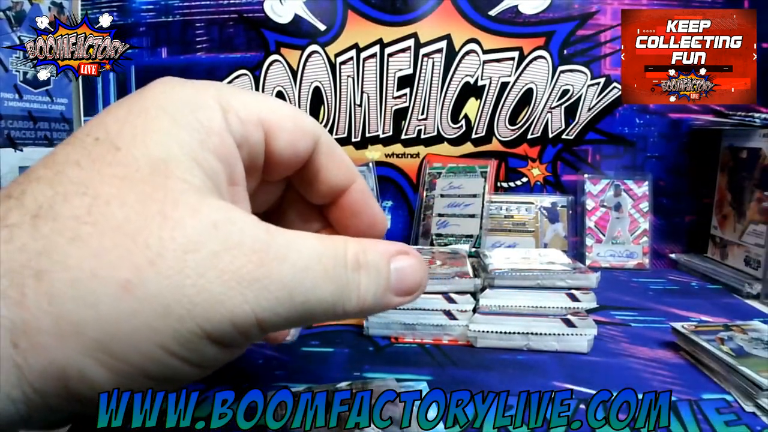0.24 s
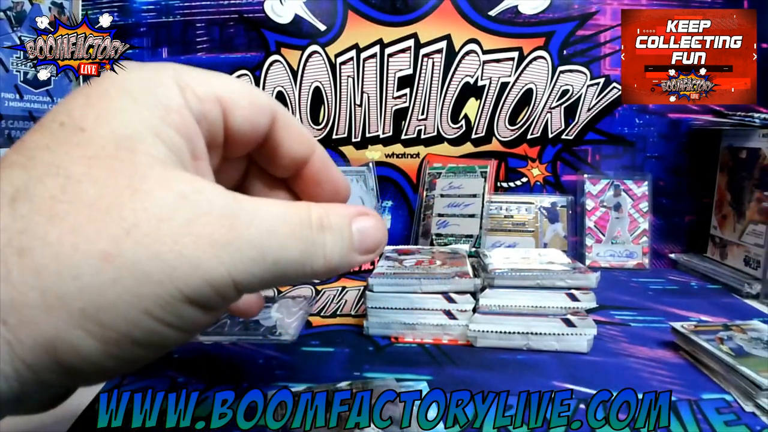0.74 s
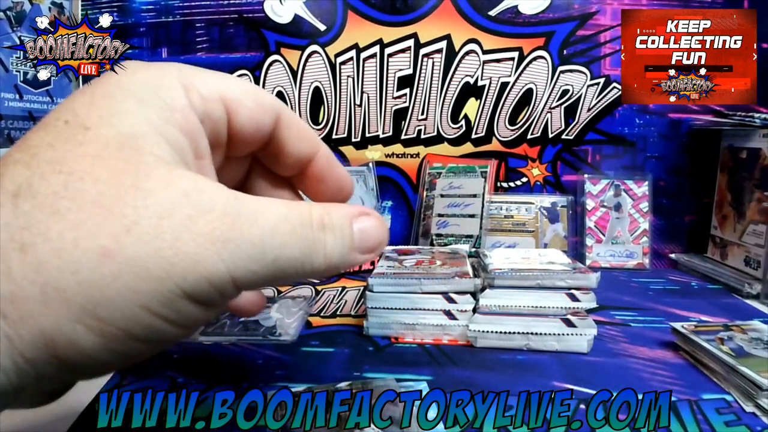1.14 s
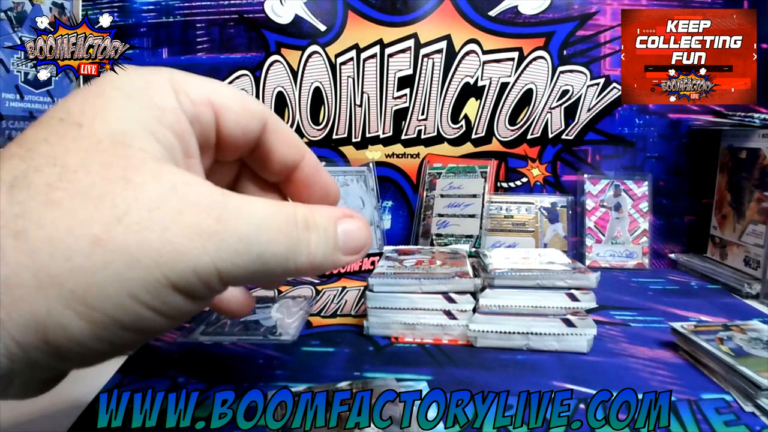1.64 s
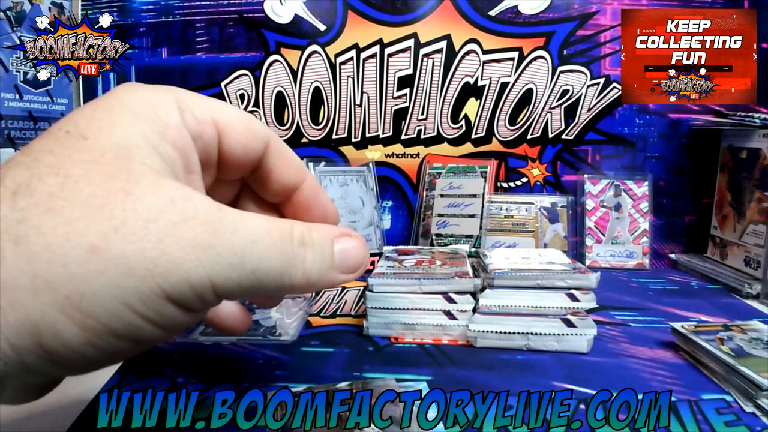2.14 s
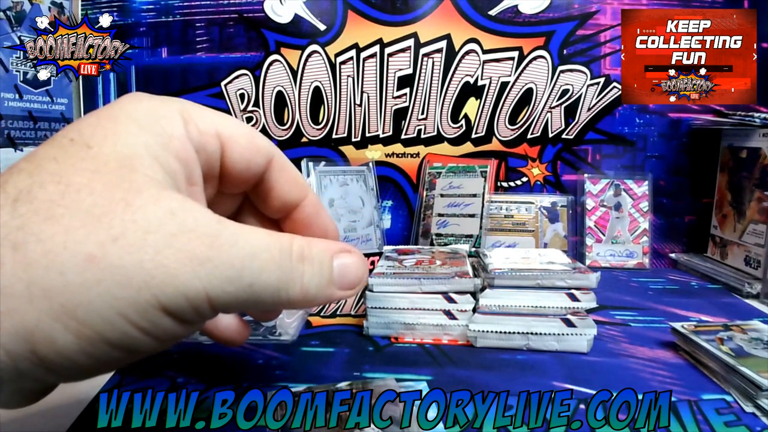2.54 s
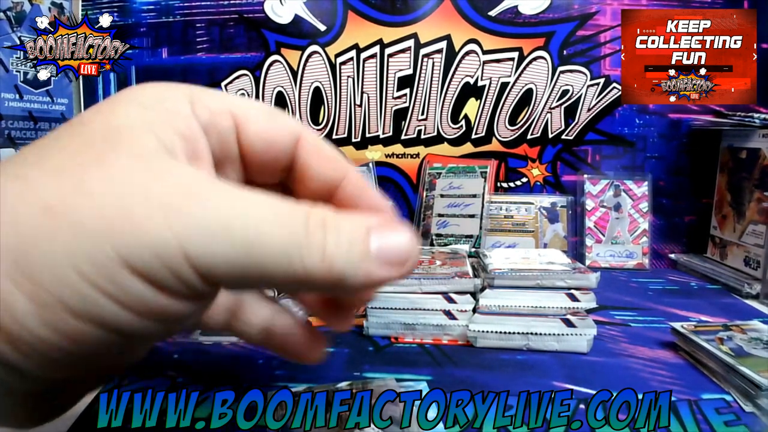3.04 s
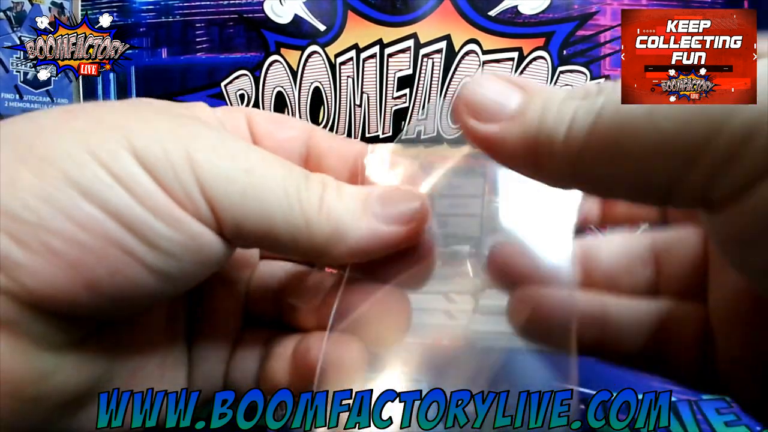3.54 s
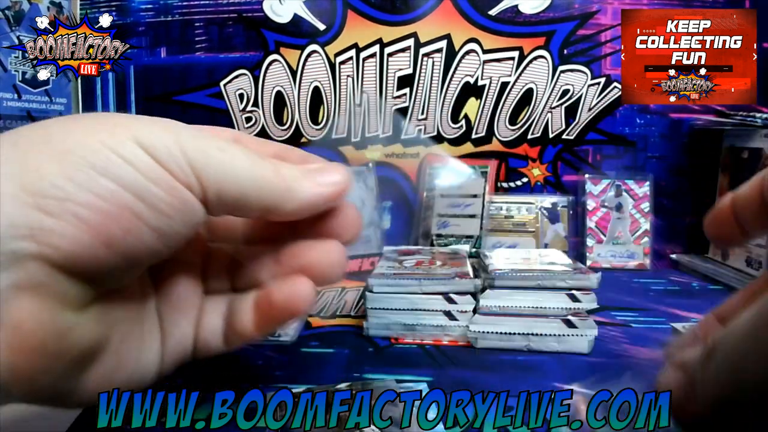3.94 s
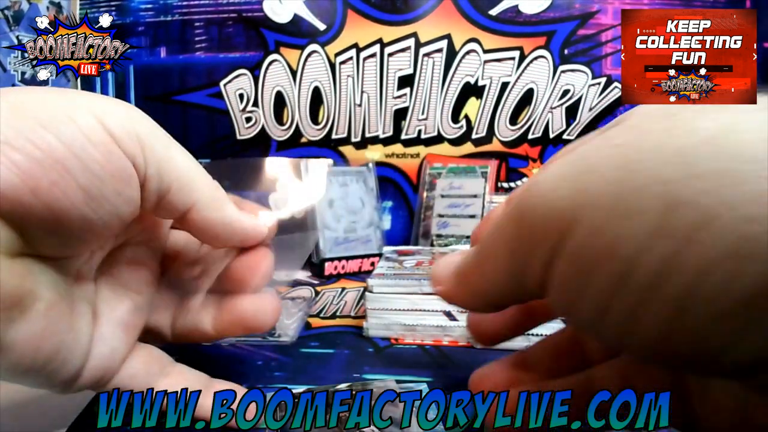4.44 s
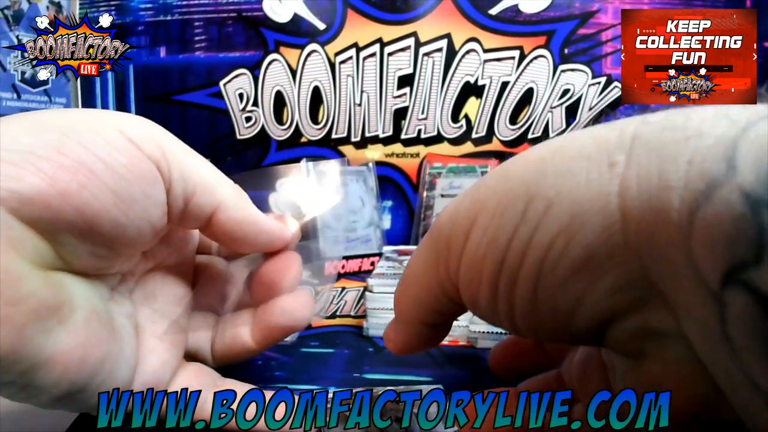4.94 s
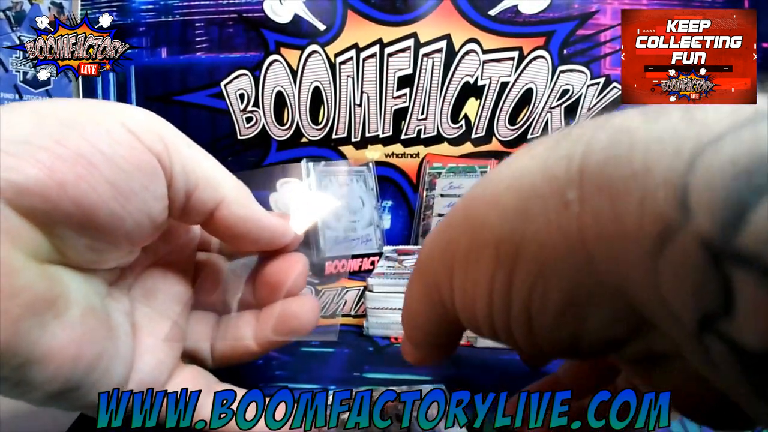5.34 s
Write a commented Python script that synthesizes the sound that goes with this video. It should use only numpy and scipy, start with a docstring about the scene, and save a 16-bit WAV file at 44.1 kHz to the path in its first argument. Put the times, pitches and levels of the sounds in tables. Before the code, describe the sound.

Thin plastic film crinkles in sharp, close snaps and crackly finger friction, then softens to faint hissy rubbing with small table bumps in a quiet room.

```python
"""At a table in a quiet room, hands pull a thin plastic card sleeve from a pack beside a two-port microphone,
then open it in front. Buckling creases make the film snap: each is a sharp step with a brief shiver and a
ringing stiff edge. Finger friction is filtered noise, part smooth hiss and part dense small crackles.
Wrists bump and drag on the table as decaying low sines and dark noise; air noise, a hum and a thin whine
fill the room."""
import sys
import numpy as np
from scipy import signal
from scipy.fft import rfft, irfft
from scipy.io import wavfile
from scipy.ndimage import uniform_filter1d, map_coordinates

SR = 44100
rng = np.random.default_rng(int(sys.argv[2]) if len(sys.argv) > 2 else 0)


def waveform_to_disk(signal):
    """Save audio, clipped to [-1, 1], as 16-bit WAV at the path in sys.argv[1]."""
    frames = np.transpose(np.atleast_2d(signal))
    scaled = np.clip(frames, -1, 1) * 32767
    samples = np.round(scaled).astype(np.int16)
    wavfile.write(sys.argv[1], SR, samples)


N = 246519


def gain_of(db):
    """Level definition: decibels to an amplitude factor."""
    return 10 ** (np.asarray(db) / 20)


def evened(x):
    """Power normalisation: scales to rms 1."""
    return x / np.sqrt(np.mean(x ** 2) + 1e-20)


def read(points, hz):
    """Logarithmic pitch scale: interpolates a spectrum table along log frequency."""
    f, value = np.transpose(points)
    return np.interp(np.log(hz + 1), np.log(f + 1), value)


def curves(rows):
    """Linear interpolation in time: each column of a timed table, sample by sample."""
    s, *columns = np.transpose(rows)
    return [np.interp(np.arange(N) / SR, s, column) for column in columns]


def colour(x, points):
    """Minimum-phase filtering: a causal response of energy 1 with the spectral shape of the table."""
    hz = abs(np.fft.fftfreq(8192, 1 / SR))
    log_gain = np.log(gain_of(read(points, hz)))
    # the Hilbert transform of the log gain gives the minimum phase
    spectrum = np.exp(np.conj(signal.hilbert(log_gain)))
    taps = np.fft.ifft(spectrum).real[:4096]
    taps /= np.linalg.norm(taps)
    return signal.oaconvolve(x, taps[None], axes=-1)[..., :N]


def add(mix, s, sound):
    """Superposition: mixes a short sound in at time s."""
    part = mix[round(s * SR):][:len(sound)]
    part += sound[:len(part)]


def wavering(hz, width_hz, db, steady):
    """Narrow-band modulation: a tone whose height and phase wander slowly about a steady part."""
    r = np.exp(-np.pi * width_hz / SR)
    noise = rng.standard_normal(N) + 1j * rng.standard_normal(N)
    drift = signal.lfilter([1], [1, -r], noise)
    carrier = np.exp(2j * np.pi * hz * np.arange(N) / SR)
    tone = (steady + drift / np.std(drift)) * carrier
    return gain_of(db) * evened(tone.real)


# spectral shape of air handling and microphone hiss: f/Hz, relative level/dB
ROOM_SPECTRUM = [(25, 6.5), (60, -45), (120, -0.5), (250, 5), (700, -4.5), (1200, -10), (3000, -10),
                 (6500, -5), (9500, -9.5), (13500, -7.5), (14800, -17)]
# left-right likeness of that noise: f/Hz, likeness [0-1]
ROOM_LIKENESS = [(130, 1), (640, 0.42), (1400, 0.023), (3000, 0.0059)]


def room(air_db=-59):
    """Diffuse-field coherence: air handling and microphone hiss, alike in the bass only, with hum and whine."""
    hz = np.fft.rfftfreq(N, 1 / SR)
    a, b = rfft(rng.standard_normal((2, N))) * gain_of(read(ROOM_SPECTRUM, hz))
    same = np.clip(read(ROOM_LIKENESS, hz), 0, 1)
    air = irfft(np.array([a, same * a + np.sqrt(1 - same ** 2) * b]), N)
    hum = wavering(hz=120, width_hz=16, db=-62.5, steady=.4)
    whine = wavering(hz=13899, width_hz=4, db=-74, steady=3)
    return gain_of(air_db) * evened(air) + hum + whine


# strokes of the fingers over the film: start t/s, hold t/s, level/dB, gain of the treble/dB
STROKES = [(0.0, 0.14, -61.5, -5), (0.613, 0.036, -42.5, -3.5), (0.658, 0.015, -36, 3.5),
           (0.813, 0.049, -57, -8), (0.987, 0.028, -31.5, 0.5), (1.087, 0.096, -37, -4.5),
           (1.201, 0.045, -40.5, -7), (1.324, 0.016, -38, -1), (1.393, 0.054, -40, 3),
           (1.496, 0.089, -42, 1), (1.716, 0.063, -35, -1), (1.832, 0.075, -38, -1),
           (1.99, 0.076, -49.5, -1), (2.128, 0.054, -41.5, -1), (2.21, 0.044, -43.5, -17),
           (2.337, 0.036, -33.5, 1), (2.441, 0.041, -38.5, -1.5), (2.607, 0.078, -47, 0.5),
           (2.707, 0.12, -41, -3), (2.81, 0.076, -53, 13), (2.981, 0.038, -51, 13.5),
           (3.187, 0.0049, -55, 19.5), (3.226, 0.029, -49.5, 8), (3.425, 0.03, -49.5, 7),
           (3.475, 0.13, -47, 9.5), (3.562, 0.13, -56, 18.5), (3.717, 0.016, -42.5, 10),
           (3.785, 0.12, -46, 11.5), (3.942, 0.23, -56, 9.5), (4.107, 0.036, -46, 9),
           (4.17, 0.063, -48.5, 7), (4.314, 0.21, -55, 5.5), (4.89, 0.042, -49, 6),
           (5.003, 0.0055, -56.5, -3), (5.17, 0.21, -52, 7), (5.47, 0.084, -60, 7)]


def strokes(grip_db_per_s=908, release_db_per_s=277, rest_db=-70):
    """Power addition of envelopes: each stroke catches fast, holds and lets go slower; also the treble gain/dB."""
    t = np.arange(N) / SR
    power = top = gain_of(2 * rest_db)
    for start, hold, db, top_db in STROKES:
        before = np.maximum(start - t, 0)
        after = np.maximum(t - start - hold, 0)
        fall = grip_db_per_s * before + release_db_per_s * after
        power = power + gain_of(2 * (db - fall))  # doubled dB: a factor on power
        top = top + gain_of(2 * (db + top_db - fall))
    return 10 * np.log10(power), 10 * np.log10(top / power)


# hands and wrists knocking the table: t/s, peak level before the port balance/dB, f/Hz
BUMPS = [(0.6, -28.5, 61), (0.616, -38, 122.7), (0.653, -41, 40.4), (1.002, -44, 45), (1.334, -37.5, 123),
         (1.444, -37, 39.46), (2.142, -37, 88), (2.161, -49, 47), (4.235, -36, 111), (4.383, -35.5, 90),
         (4.891, -34, 95.8), (5.109, -40.5, 98.6), (5.391, -36, 53.7)]
# hands resting and dragging on the table top: t/s, level while the strokes are at -50 dB/dB
DRAG = [(0, -48), (.6, -49.5), (1.1, -58), (1.75, -57), (2.15, -51.5), (2.8, -57), (3.25, -51.5),
        (3.6, -56), (4.15, -55.5), (4.35, -51), (4.55, -46), (4.7, -54.5), (5.2, -51.5), (5.4, -44),
        (5.46, -53)]
# spectral shape of the drag: f/Hz, relative level/dB
TABLE_SPECTRUM = [(20, 8.5), (60, -5), (130, -0.5), (200, -10), (276, -6.5), (370, -23.5), (490, -10),
                  (570, -20), (657, -11), (800, -20.5), (2500, -25.5)]


def table(lumps_db=2.5, follow=0.48, t60=0.057):
    """Structure-borne sound: low knocks and a lumpy drag, rising with each stroke, reach both ports by the stand."""
    knocks, t = np.zeros(N), np.arange(SR // 4) / SR
    for s, db, hz in BUMPS:
        onset = 1 - np.exp(-t / 0.0028)
        knock = gain_of(-60 * t / t60) * np.sin(2 * np.pi * hz * t) * onset
        add(knocks, s, gain_of(db) * knock / abs(knock).max())
    lumps = gain_of(lumps_db * evened(uniform_filter1d(rng.standard_normal(N), 800)))
    drag_db = curves(DRAG)[0] + follow * (strokes()[0] + 50)
    rough = evened(lumps) * rng.standard_normal((2, N))
    a, b = colour(rough, TABLE_SPECTRUM) * gain_of(drag_db)
    balance = gain_of([[-.8], [.8]])  # left, right
    return balance * (knocks + a + 0.3 * np.array([b, -b]))


def echoes(x, t60=0.033, first_ms=0.94):
    """Early reflection: table top, stacked packs and walls answer with a short tail of sparse taps."""
    t = np.arange(SR // 4) / SR
    taps = rng.choice([-1., 1.], (2, len(t))) * (rng.random((2, len(t))) < .08)
    taps *= gain_of(-60 * t / t60) * (1000 * t > first_ms)
    taps /= np.linalg.norm(taps, axis=1, keepdims=True)
    return signal.oaconvolve(x, taps, axes=1)[:, :N]


# how the film is handled: t/s, likeness of the ports below the treble [0-1], crackle share of power [0-1]
HANDS = [(2.5, 0.84, 0.56), (2.6, 0.32, 0.45), (3.18, 1, 0)]
# the sleeve moves from the right to the front: t/s, delay of the left port/ms
PLACE = [(3.1, .16), (3.18, .03)]


def ports(x, other, apart_hz=8500, apart=0.037):
    """Path difference and coherence: the left port hears late, and partly by another path, mostly in the treble."""
    delay_ms, same = curves(PLACE)[0], curves(HANDS)[0]
    heard_at = np.arange(N) - delay_ms * SR / 1000
    late = map_coordinates(x, [heard_at], order=5, mode="nearest")
    top = 1 / (1 + (apart_hz / (np.fft.rfftfreq(N, 1 / SR) + 1)) ** 6)
    left = 0
    for band, like in ((1 - top, same), (top, apart * same)):
        like = np.clip(like, 0, 1)
        blend = like * late + np.sqrt(1 - like ** 2) * other
        left = left + irfft(band * rfft(blend), N)
    return np.array([left, x])


def patchy(x, depth_db, width=4, length=20):
    """Time-frequency modulation: random patches give each crease and stroke its own colour."""
    hz, t, z = signal.stft(x, nperseg=256, noverlap=192)
    field = rng.standard_normal((len(hz), len(t)))
    field = uniform_filter1d(field, width, 0)  # across frequency
    field = evened(uniform_filter1d(field, length, 1))  # along time
    shaped = z * evened(gain_of(depth_db * field))
    return signal.istft(shaped, nperseg=256, noverlap=192)[1][..., :N]


# spectral shape of the film's crackles and snaps: f/Hz, relative level/dB
FILM_SPECTRUM = [(500, -47.5), (1500, -11), (2700, -8.5), (3350, 1), (4100, -7.5), (4900, 2), (5500, 0.5),
                 (6750, 7), (7600, 0.5), (9000, -8), (11500, -4.5), (12700, -9), (13600, 0), (14800, -56)]
# spectral shape of the smooth friction: f/Hz, relative level/dB
HISS_SPECTRUM = [(700, -21), (2500, -7.5), (4300, -6), (6500, 7.5), (8000, -0.5), (10300, -11), (12700, -6),
                 (14500, -20)]


def rub(per_s=330, spread_db=6.5, flutter_db=2, grain_ms=1.0, sheen_hz=9500, patch_db=3.0):
    """Stick-slip friction: smooth hiss plus many small random creases, both following the strokes."""
    crackle = np.clip(curves(HANDS)[1], 0, 1)
    sizes = gain_of(spread_db * np.minimum(rng.exponential(1, N), 2.6))
    sizes *= rng.random(N) < per_s / SR  # creases fall at random times
    creases = evened(signal.lfilter([1], [1, -np.exp(-1000 / grain_ms / SR)], sizes))
    slips = evened(uniform_filter1d(rng.standard_normal(N), 400))  # the grip slips
    flutter = evened(gain_of(flutter_db * slips))
    film = colour(np.sqrt(crackle) * creases * rng.standard_normal((2, N)), FILM_SPECTRUM)
    film += colour(np.sqrt(1 - crackle) * flutter * rng.standard_normal((2, N)), HISS_SPECTRUM)
    film = patchy(film, patch_db)
    high_pass = signal.butter(4, sheen_hz, "high", fs=SR, output="sos")
    top = signal.sosfiltfilt(high_pass, film)
    level_db, sheen_db = strokes()
    stroked = gain_of(level_db) * (film + (gain_of(sheen_db) - 1) * top)
    return ports(*stroked)


# modes of the sleeve's stiff edge: f/Hz, relative level/dB, t60/s
EDGE_MODES = [(650, -24, .02), (1100, -17, .007), (1800, -18, .006), (2330, -20, .006), (3400, -5, .004),
              (4900, -4, .004), (6500, 3, .003)]


def edge(blow_db, bend, dull_db_per_khz=.2, wander_per_db=.004):
    """Modal decay, energy 1: weaker blows wake the high modes less and find the edge bent out of tune."""
    t = np.arange(2048) / SR
    under_db = max(db + body_db for s, db, body_db in SNAPS) - blow_db  # below the strongest blow
    hz, db, t60 = np.transpose(EDGE_MODES)[..., None]
    tuned_hz = hz + hz * wander_per_db * under_db * bend[:, None]
    dull_db = dull_db_per_khz * under_db * hz / 1000
    fade = gain_of(db - dull_db - 60 * t / t60)
    ring = (fade * np.sin(2 * np.pi * tuned_hz * t)).sum(0)
    return ring / np.linalg.norm(ring)


# creases that flip over: t/s, strength level/dB, stiff body relative to the snap level/dB
SNAPS = [(0.6624, -5, -23), (0.6704, -7, -18), (0.6762, -8, -23), (0.7436, -18, -15), (0.849, -19, -17),
         (0.9687, -16, -19), (0.994, -7, -15), (1.0031, 1, -12), (1.0161, -12, -13), (1.0373, -14, -18),
         (1.0711, -9, -21), (1.0827, -10, -28), (1.0942, -7, -20), (1.1212, -8, -16), (1.1445, -11, -17),
         (1.1547, -11, -16), (1.1863, -15, -7), (1.2121, -16, -25), (1.2438, -9, -15), (1.328, -17, -20),
         (1.3343, -13, -13), (1.3933, -10, -23), (1.3984, -4, -26), (1.4049, -7, -34), (1.4313, -10, -26),
         (1.4505, -8, -20), (1.4542, -11, -22), (1.5245, -8, -21), (1.5298, -8, -16), (1.5495, -1, -18),
         (1.5917, -13, -21), (1.7155, -16, -6), (1.7309, -10, -13), (1.7539, -11, -11), (1.763, -4, -31),
         (1.7959, -5, -25), (1.8231, -14, -21), (1.8703, 2, -22), (1.8762, -10, -18), (1.8877, 5, -9),
         (1.9658, -19, -10), (2.1379, -13, -10), (2.1684, -15, -25), (2.2055, -6, -20), (2.2668, -14, -14),
         (2.3354, -2, -20), (2.3545, -6, -11), (2.3737, -7, -11), (2.4416, -12, -11), (2.4704, -15, -18),
         (2.5109, -16, -19), (2.618, -21, -20), (2.729, -19, -22), (2.741, -18, -22), (2.779, -21, -20),
         (2.807, -16, -14), (2.8849, -20, -19), (3.1932, -20, -24), (3.2203, -21, 0), (3.2435, -23, -7),
         (3.448, -34, 6), (3.4665, -19, -3), (3.475, -32, 5), (3.4899, -7, 7), (3.4998, -15, -13),
         (3.7447, -16, -17), (3.8337, -28, 8), (4.8925, -31, 8)]


def snaps(shiver_ms=1.0):
    """Snap-through buckling: a faint tear, one sharp step, and a millisecond of shiver in the film."""
    ms = np.arange(-60, 200) * 1000 / SR
    shape = np.exp(-(ms / shiver_ms * (1 + 1.2 * (ms < 0))) ** 2)  # shorter before the step
    loose = gain_of(-.5 * np.array(SNAPS)[:, 1, None, None])  # weak snaps tear, strong ones flip clean
    shivers = .2 * loose * rng.standard_normal((len(SNAPS), 2, len(ms))) * shape
    shivers[:, 0, ms == 0] = 1
    # strength counts what the film radiates
    weight = gain_of(read(FILM_SPECTRUM, np.fft.rfftfreq(len(ms), 1 / SR)))
    radiated = np.linalg.norm(rfft(shivers) * weight, axis=2, keepdims=True)
    shivers /= radiated / np.linalg.norm(weight)
    # the stiff parts feel mostly the step
    steps = 0.03 * rng.standard_normal(shivers.shape) * shape + (ms == 0)
    bends = rng.standard_normal((len(SNAPS), len(EDGE_MODES)))
    skin, body = np.zeros((2, N)), np.zeros((2, N))
    for (s, db, body_db), pair, step, bend in zip(SNAPS, shivers, steps, bends):
        ring = edge(db + body_db, bend)
        for k in (0, 1):  # the direct and the other path
            add(skin[k], s - .001, gain_of(db) * pair[k])
            add(body[k], s - .001, gain_of(db + body_db) * np.convolve(step[k], ring))
    return ports(*(colour(skin, FILM_SPECTRUM) + body))


def scene():
    """Superposition: film close by, with its echoes, over the table and the room."""
    film = snaps() + rub()
    wet = gain_of(-11) * echoes(film)
    balance = gain_of([[-.3], [.3]])  # left, right
    return film * balance + wet + table() + room()


def record(dry):
    """Low-pass response: the microphone fades out towards the top, then the band limit."""
    fade_out = signal.butter(24, 14800, fs=SR, output="sos")
    dull = signal.sosfilt(fade_out, dry)
    band_limit = signal.firwin(511, 16400, window=("kaiser", 9), fs=SR)
    return signal.oaconvolve(dull, band_limit[None], "same")


dry = scene()
out = record(dry)
waveform_to_disk(out)
```